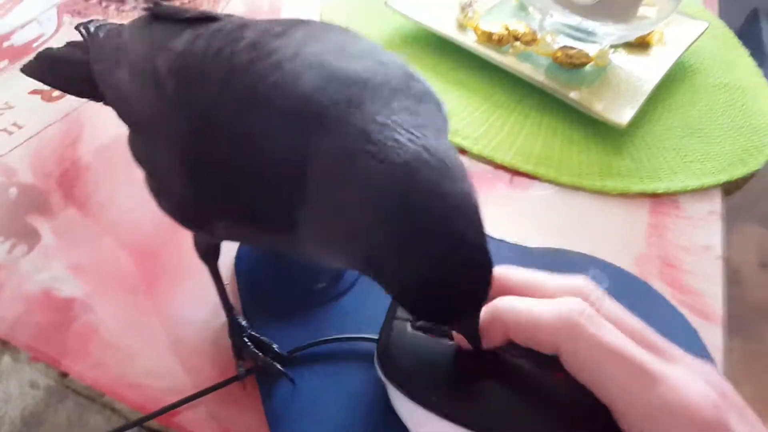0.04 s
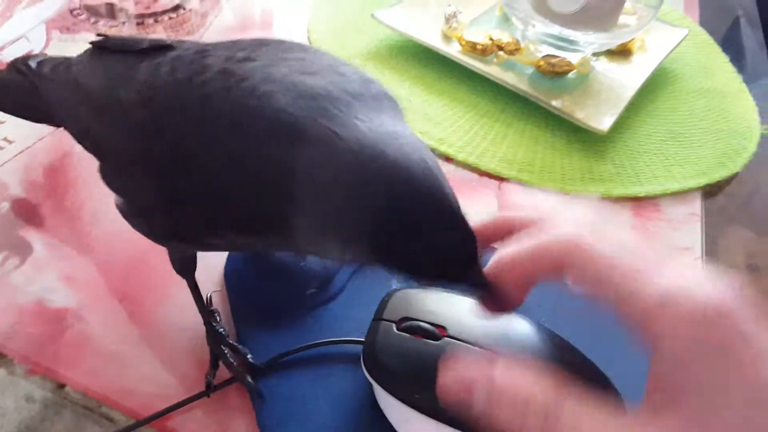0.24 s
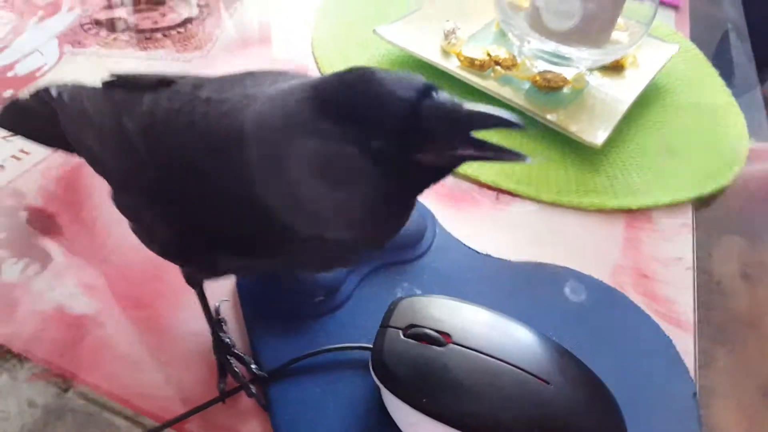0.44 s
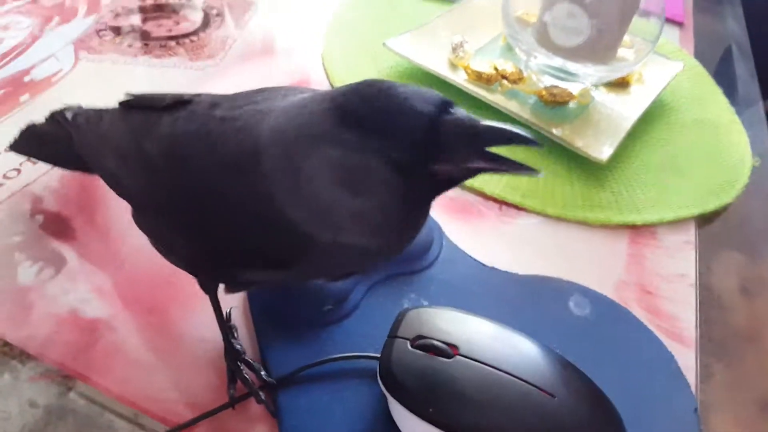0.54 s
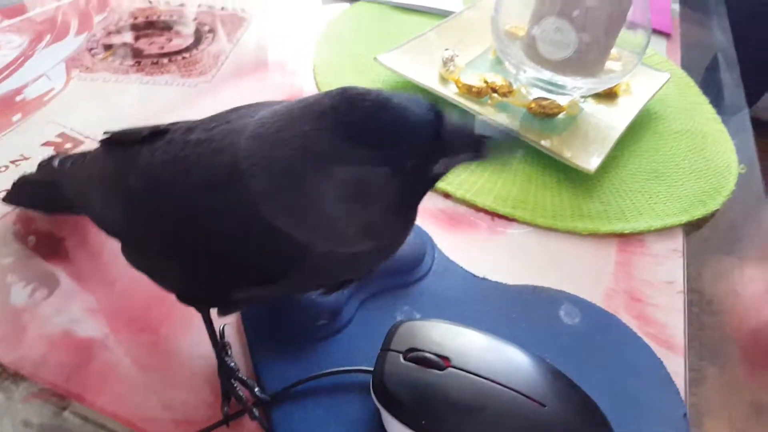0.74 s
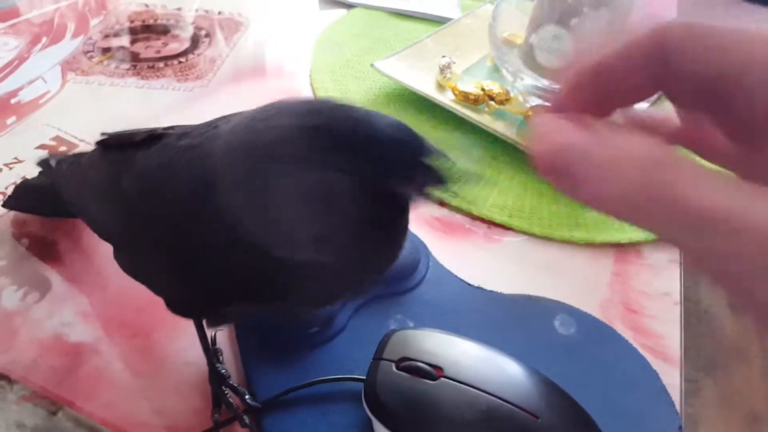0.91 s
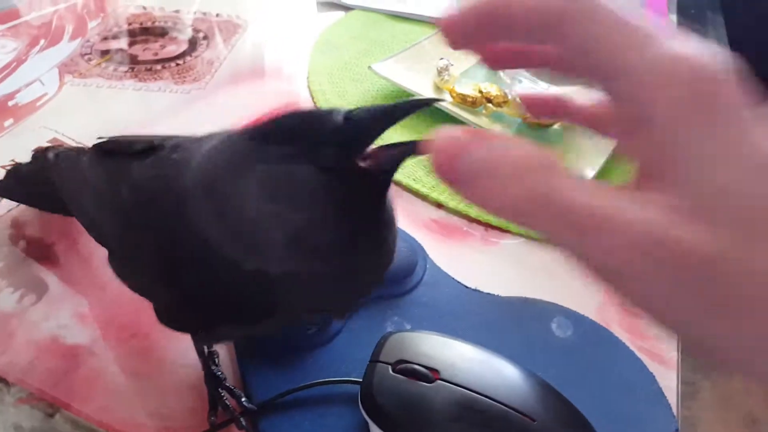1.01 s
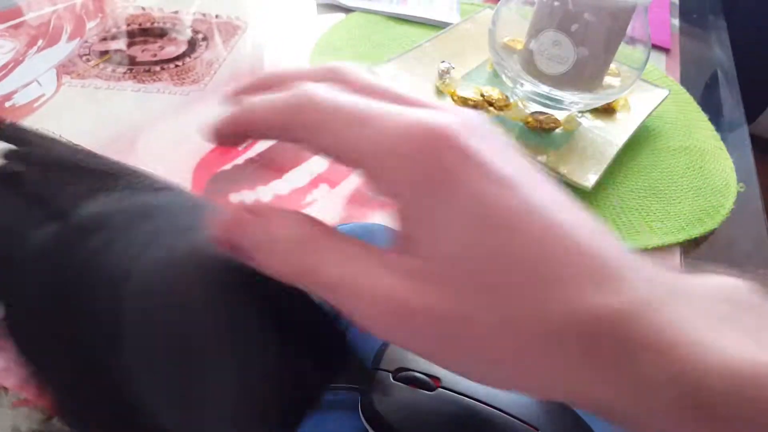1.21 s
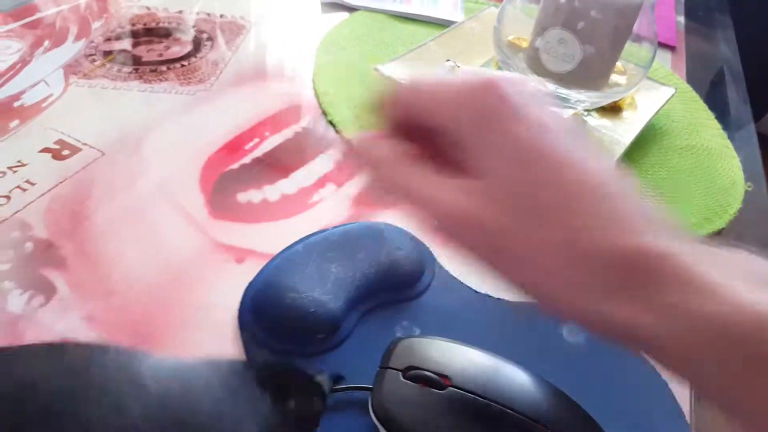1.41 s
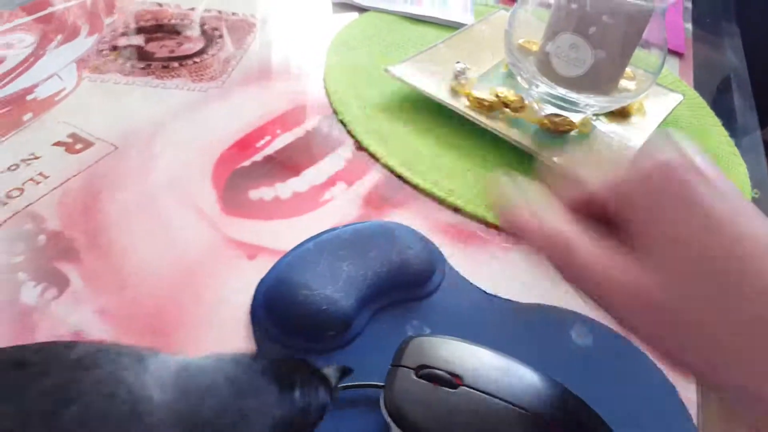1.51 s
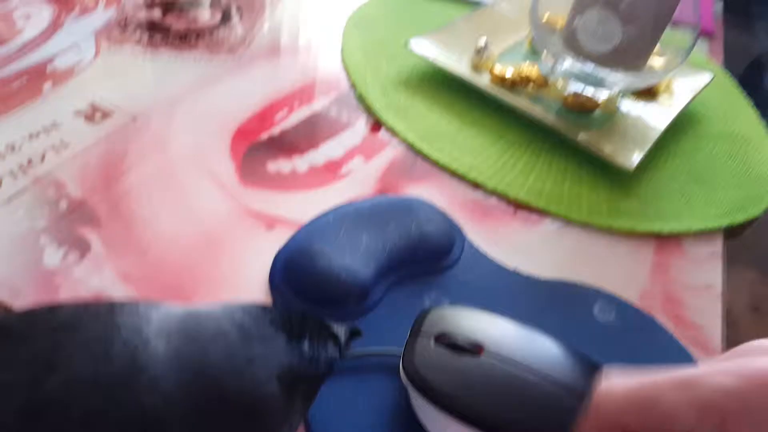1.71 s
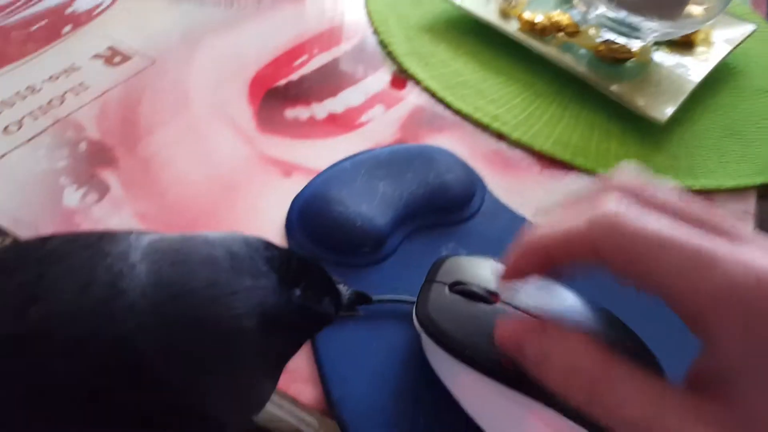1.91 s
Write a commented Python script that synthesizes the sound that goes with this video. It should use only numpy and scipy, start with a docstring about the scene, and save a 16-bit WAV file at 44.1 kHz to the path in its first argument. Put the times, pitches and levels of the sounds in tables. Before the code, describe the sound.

A jackdaw scolds with four short, harsh, buzzy calls dropping in pitch. Before them its beak raps hollow plastic in a quick double knock; faint table brushes and claw ticks fall between calls. Close stereo, small quiet room.

```python
"""A faint brush over the low hum of a small room, then a tame jackdaw on a table knocks a plastic shell.
It scolds a hand with four harsh calls: noise bursts click its beak, then uneven pulses sound a buzzy note
that drops in pitch and ends in a creak. Grainy noise brushes the table between calls, with small claw ticks.
Two close microphones hear it all, with echoes off nearby things and a short room ring."""
import sys
import numpy as np
from scipy import signal
from scipy.fft import rfft, irfft, next_fast_len
from scipy.io import wavfile
from scipy.ndimage import uniform_filter1d

SR = 44100
rng = np.random.default_rng(int(sys.argv[2]) if len(sys.argv) > 2 else 0)


def output_pcm(signal):
    """Save a mono or channel-first signal as 16-bit PCM at the path in sys.argv[1].

    Samples are clipped to [-1, 1] before scaling.
    """
    pcm = np.clip(np.atleast_2d(signal).T, -1, 1) * 32767
    wavfile.write(sys.argv[1], SR, np.round(pcm).astype(np.int16))


N = 85995
T = np.arange(N) / SR  # time in seconds

# Hum of the quiet room. Each row: frequency in Hz, level in dB.
HUM_SPECTRUM = [(22, -21), (50, -10), (110, 0), (175, -8), (260, -9), (480, -19), (15000, -42)]
HUM_DB, HUM_SIDE = -62.5, .2  # level; share that differs between the microphones

# Hand and feet brush the table. Each row: middle in seconds, half length in seconds, level in dB.
BRUSH_STROKES = [(.005, .045, -52), (1.184, .013, -39), (1.213, .008, -36), (1.457, .013, -48)]
# Colour of the brushing. Each row: frequency in Hz, level in dB.
BRUSH_SPECTRUM = [(30, -31.5), (130, -3), (280, -16), (600, 3.5), (1200, -8.5), (2200, -8), (14000, -33.5)]
BRUSH_GRAIN_DB = 2
# Claws tick on the table. Each row: start in seconds, level in dB.
CLAW_TICKS = [(1.206, -32), (1.418, -37)]
# Colour of a claw tick. Each row: frequency in Hz, level in dB.
CLAW_SPECTRUM = [(100, -15.5), (800, -1.5), (9000, -13.5), (15000, -1.5)]
CLAW_DECAY_S = 0.0013

# The beak knocks on a plastic shell.
# Each row: start in seconds, level in dB, decay in seconds, treble tilt in dB per octave.
SHELL_PECKS = [(.172, -45.5, 0.0037, 2.5), (0.2036, -15.5, 0.0017, 7.5), (.2085, -27.5, 0.017, 2),
               (0.2134, -11, 0.0019, 3.5), (.223, -35, 0.012, 1)]
# Colour of the shell. Each row: frequency in Hz, level in dB.
SHELL_SPECTRUM = [(200, -56.5), (660, 9), (1000, -7), (1900, -4.5), (2600, -4), (3200, -21), (3900, -10),
                  (6000, -28.5), (15000, -43.5)]
# Ringing modes of the shell. Each row: frequency in Hz, level in dB against the knock, t60 in seconds.
SHELL_RINGS = [(690, -6, .013), (620, -26, .15)]

# Beak click before each call. Each row: start in seconds, level in dB.
CLICKS = [(0.3697, -15), (1.0004, -22), (1.237, -15.5), (1.533, -20)]
# Colour of the beak. Each row: frequency in Hz, level in dB.
BEAK_SPECTRUM = [(100, -38), (350, -5), (600, 6), (900, -9), (1900, -1), (3000, -13.5), (15000, -51.5)]
BEAK_DECAY_S = 0.0015

# Course of each call. Each row: time in seconds, pitch in Hz, level in dB before VOICE_DB,
# roughness from 0 to 1, moving throat resonance in Hz.
FIRST_CALL = [(.375, 1650, -34.5, 0.25, 1590), (.382, 1561, -20.5, 0.28, 1720), (.388, 818, -16, 0.1, 1580),
              (0.394, 781.3, -11, 0.1, 2120), (.403, 749, -13.5, 0.17, 2380),
              (0.408, 563, -11.5, 0.35, 2400), (0.422, 554.2, -13, 0.36, 1750),
              (.444, 470.7, -18.5, 0.3, 1570), (0.453, 446.6, -14.5, 0, 2700),
              (0.475, 387.4, -20, 0.47, 1760), (0.489, 329.5, -23, 0.74, 1700),
              (0.507, 354.5, -33.5, 0.3, 390)]
SECOND_CALL = [(1.014, 1765, -21, 0.45, 1816), (1.019, 1498, -26, 0.8, 1790),
               (1.022, 691.3, -13.5, 0.87, 1350), (1.033, 682, -13.5, 0.93, 2100),
               (1.052, 593, -13, 0.22, 2180), (1.062, 506.6, -18, 0.47, 2170),
               (1.079, 427.5, -18.5, 0.24, 1960), (1.09, 344.5, -25.5, 0.89, 2030),
               (1.103, 319, -32, 0.37, 400)]
THIRD_CALL = [(1.241, 1478, -31, 0.26, 1500), (1.249, 1536, -24, 0.38, 1565),
              (1.255, 725, -17.5, 0.57, 2560), (1.265, 633.5, -11.5, 0.68, 2730),
              (1.273, 691.7, -16, 0.66, 4100), (1.286, 609, -15, 0.091, 2440),
              (1.299, 486.3, -20.5, 0.24, 1000), (1.315, 401, -21.5, 0.34, 2340),
              (1.334, 298, -33.5, 0.35, 404)]
FOURTH_CALL = [(1.537, 1448, -36, 0.24, 1414), (1.543, 1275, -27.5, .2, 1200),
               (1.548, 889, -17, 0.23, 1000), (1.556, 661, -16.5, 0.57, 1372), (1.572, 662, -16, .8, 1400),
               (1.581, 648.4, -18.5, 0.31, 2080), (1.598, 585.4, -15, 0.16, 2370),
               (1.606, 526.6, -17, 0.047, 3170), (1.63, 510.2, -16.5, 0.024, 3210),
               (1.642, 492.9, -17, 0.015, 2450), (1.659, 465.2, -19, 0.04, 2330),
               (1.671, 394.4, -23.5, .7, 3000), (1.687, 350.4, -34, 0.23, 500)]
# Colour of throat and open beak in each call. Each row: frequency in Hz, level in dB.
FIRST_THROAT = [(350, -9), (600, -6), (950, -8.5), (1500, -2), (2000, -2), (2500, 1.5), (3300, -1.5),
                (4300, -7), (5200, -3), (6000, -10.5), (7200, -6.5), (9000, -15), (15000, -27)]
SECOND_THROAT = [(350, -11), (600, -2.5), (950, -5.5), (1500, -1), (2000, -3.5), (2500, 1), (3300, -1),
                 (4300, -2.5), (5200, -15.5), (7200, -9.5), (9000, -16.5), (10300, -15.5), (15000, -31.5)]
THIRD_THROAT = [(350, -12), (600, -2.5), (950, -7), (1500, -9.5), (2000, -2), (2500, -3.5), (4100, 1),
                (5200, -16.5), (7200, -5.5), (9000, -18), (10300, -9), (12200, -26.5), (15000, -20.5)]
FOURTH_THROAT = [(450, -13.5), (650, -3.5), (1000, -2.5), (1500, 2.5), (2000, -5), (2500, -3), (3200, -1),
                 (4300, -13.5), (5200, -18.5), (7000, -5), (9000, -20.5), (10300, -15), (15000, -32)]
# How much later each call reaches the right microphone. One entry per call: delay in ms.
RIGHT_LAGS_MS = [0.06, 0.12, 0.09, 0.11]

# Unevenness of the syrinx at full roughness: jitter in log pitch, half tone and rasp as amplitudes
JITTER, JITTER_PER_S, SHIMMER_DB, HALF_TONE, RASP = .06, 250, 3.5, .65, .65
RASP_ABOVE_HZ = 1200
PARTIAL_WANDER_DB, PARTIAL_SLIP_RAD, PARTIAL_WANDER_PER_S = 6, 1.6, 45
DULL_PER_DB = 0.2022  # overtones lose this many dB per octave for each dB below a call's peak
RESONANCE_DB, RESONANCE_WIDTH_HZ = 9, 260
# Span of the fixed throat and beak resonances. Entries: lowest in Hz, highest in Hz.
RING_SPAN_HZ = (1100, 12000)
RING_WIDTH_HZ = 450
FADE_S, VOICE_DB, LOW_CUT_HZ = 0.0014, 1, 207

# Echoes off table and nearby things. Each row: left delay in ms, right delay in ms, level in dB.
NEAR_ECHOES = [(0.901, 1.1, -25), (2.3, 1.9, -32)]
# Left microphone minus right. Each row: frequency in Hz, difference in dB.
MICROPHONE_DIFFERENCE = [(300, 0), (650, 3.5), (1500, 6.5), (2500, -1.5), (3300, -1), (4300, 2), (6000, -5),
                         (7200, -6), (9000, 2), (10300, 8), (12200, 1)]
# Ring time of the room. Each row: frequency in Hz, t60 in seconds.
ROOM_RING_TIME = [(500, .36), (2500, .36), (7000, .29), (15000, .21)]
# Strength of the room's tail. Each row: frequency in Hz, level in dB.
ROOM_SPECTRUM = [(300, -9.5), (700, -11), (1500, -15), (2000, -16), (2500, -10), (3200, -16), (4200, -14),
                 (7000, -11), (15000, -13)]
# Narrow tones that ring on in the room. Each row: frequency in Hz, level in dB, t60 in seconds.
RINGING_TONES = [(1010, -12, .35), (1450, -14, .35), (2380, -3, .42), (2520, -4, .42)]
EARLY_DB, EARLY_DECAY_S, ROOM_GAP_S = -8, .009, .0015
TURN_AWAY_DB_PER_S = 6  # the bird turns from the microphones, so the room's share grows
CUTOFF_HZ = 15800


def from_db(db):
    """Decibels to gain."""
    return 10 ** (np.asarray(db) / 20)


def rms_one(x):
    """Scale to unit power."""
    return x / np.sqrt(np.mean(x ** 2) + 1e-20)


def at_hz(points, hz):
    """Read a table on a log-frequency axis."""
    f, v = np.transpose(points)
    return np.interp(np.log(np.maximum(hz, 1)), np.log(f), v)


def colour(x, points, power=1, unit=True):
    """Causal (minimum-phase) filter with the given spectrum; unit keeps the power of white noise."""
    size = 2 * next_fast_len(N)
    hz = np.arange(size // 2 + 1) * SR / size
    gain = from_db(power * at_hz(points, hz))
    cepstrum = irfft(np.log(rms_one(gain) if unit else gain))
    # folding the cepstrum forward in time makes the filter causal
    cepstrum[1:size // 2] *= 2
    cepstrum[size // 2 + 1:] = 0
    return irfft(rfft(x, size) * np.exp(rfft(cepstrum)))[..., :N]


def high_pass(x, hz, order=2):
    """Take away what lies below a frequency."""
    return signal.sosfilt(signal.butter(order, hz, "high", fs=SR, output="sos"), x)


def drift(rate):
    """Smooth chance with spread 1: noise through two equal low-pass poles at rate in Hz."""
    r = np.exp(-2 * np.pi * rate / SR)
    noise = rng.standard_normal(N + SR)
    settled = signal.lfilter([1], [1, -2 * r, r * r], noise)[SR:]
    return rms_one(settled)


def delay(x, ms):
    """Delay by any fraction of a sample, as a phase slope."""
    size = 2 * next_fast_len(N)
    hz = np.arange(size // 2 + 1) / size * SR
    return irfft(rfft(x, size) * np.exp(-2j * np.pi * hz * ms / 1000))[:N]


def burst(s, db, decay_s):
    """A contact: noise that starts at once and dies away."""
    fall = np.exp(-np.clip((T - s) / decay_s, 0, 60))
    return from_db(db) * (T >= s) * fall * rng.choice([-1, 1], N)


def room_hum():
    """Low coloured noise, mostly shared by the two microphones."""
    shared = rng.standard_normal(N)
    noise = shared + HUM_SIDE * rng.standard_normal((2, N))
    return from_db(HUM_DB) * colour(noise, HUM_SPECTRUM)


def scuffle():
    """Friction on the table as grainy noise under smooth strokes, with short noise bursts for claws."""
    strokes = sum(from_db(db) * np.exp(-.5 * ((T - s) / half) ** 2) for s, half, db in BRUSH_STROKES)
    grain = from_db(BRUSH_GRAIN_DB * drift(100)) * rng.standard_normal(N)
    ticks = sum(burst(s, db, CLAW_DECAY_S) for s, db in CLAW_TICKS)
    return colour(strokes * grain, BRUSH_SPECTRUM) + colour(ticks, CLAW_SPECTRUM)


def pecks():
    """The beak hits, skids and knocks as noise bursts; decaying sines ring the hollow shell."""
    out = np.zeros(N)
    for s, db, decay_s, tilt_db in SHELL_PECKS:
        tilted = [(hz, d + tilt_db * np.log2(hz)) for hz, d in SHELL_SPECTRUM]
        out += colour(burst(s, db, decay_s), tilted)
        age = np.maximum(T - s, 0)
        for hz, mode_db, t60 in SHELL_RINGS:
            fall = np.exp(-np.log(1000) * age / t60)
            out += from_db(db + mode_db) * fall * np.sin(2 * np.pi * hz * age)
    return high_pass(out, 420)


def beak_clicks():
    """The beak parts softly before each call: short bursts in the colour of the beak."""
    clicks = sum(burst(s, db, BEAK_DECAY_S) for s, db in CLICKS)
    return colour(clicks, BEAK_SPECTRUM)


def ring_on(x):
    """Many narrow resonances of throat and beak, as all-passes, smear each pulse over its cycle."""
    r = np.exp(-np.pi * RING_WIDTH_HZ / SR)
    for hz in np.geomspace(*RING_SPAN_HZ, 14):
        a = [1, -2 * r * np.cos(2 * np.pi * hz / SR), r * r]
        x = signal.lfilter(a[::-1], a, x)
    return x


def syrinx_pulses(pitch, phase, rough, slope_db, resonance_hz, on):
    """Overtones sum to pulses, uneven where rough, duller when weak; a moving resonance lifts some."""
    pulses, wander = np.zeros(N), drift(PARTIAL_WANDER_PER_S)
    half_tone = 1 + HALF_TONE * rough * np.cos(phase / 2)
    uneven = half_tone * from_db(SHIMMER_DB * rough * drift(JITTER_PER_S))
    for k in range(1, 50):
        # rough partials break up: each reads the wander at its own random places
        places = (np.flatnonzero(on) + rng.integers(N, size=(2, 1))) % N
        swell, slip = np.sqrt(rough[on]) * wander[places]
        hz = k * pitch[on]
        lift_db = RESONANCE_DB * np.exp(-.5 * ((hz - resonance_hz[on]) / RESONANCE_WIDTH_HZ) ** 2)
        partial_db = slope_db[on] * np.log2(k) + lift_db + PARTIAL_WANDER_DB * swell
        partial = from_db(partial_db) * np.cos(k * phase[on] + PARTIAL_SLIP_RAD * slip)
        partial *= hz < CUTOFF_HZ
        # the fundamental carries no half tone or shimmer
        pulses[on] += partial * uneven[on] if k > 1 else partial
    return pulses * np.sqrt(2 * pitch / CUTOFF_HZ)


def breath_rasp(phase, rough, slope_db):
    """Noise that swells once per pulse where the syrinx is rough."""
    strength = RASP * rough * from_db(3 * slope_db)
    return high_pass(strength * (1 + np.cos(phase)) * rng.standard_normal(N), RASP_ABOVE_HZ)


def call(rows, throat):
    """Syrinx pulses and rasp ring in the throat and follow the call's course of pitch and level."""
    s, hz, db, rough, resonance_hz = np.transpose(rows)
    rough = np.clip(np.interp(T, s, rough), 0, 1)
    level_db = np.interp(T, s, db)
    resonance_hz = np.interp(T, s, resonance_hz)
    pitch = np.exp(np.interp(T, s, np.log(hz)) + JITTER * rough * drift(JITTER_PER_S))
    phase = 2 * np.pi * np.cumsum(pitch) / SR
    gate = np.clip(np.minimum(T - s[0], s[-1] - T) / FADE_S + 1, 0, 1)
    slope_db = DULL_PER_DB * (level_db - db.max())
    pulses = syrinx_pulses(pitch, phase, rough, slope_db, resonance_hz, gate > 0)
    voice = ring_on(colour(pulses + breath_rasp(phase, rough, slope_db), throat))
    # even out the running power, so the course alone sets the level
    voice /= np.sqrt(np.abs(uniform_filter1d(voice ** 2, size=300)) + 1e-3)
    return high_pass(voice * gate * from_db(level_db + VOICE_DB) + 1e-18, LOW_CUT_HZ, order=4)


def jackdaw_calls():
    """Four calls from a little to the left, so each reaches the right microphone later."""
    courses = (FIRST_CALL, SECOND_CALL, THIRD_CALL, FOURTH_CALL)
    throats = (FIRST_THROAT, SECOND_THROAT, THIRD_THROAT, FOURTH_THROAT)
    calls = [call(rows, throat) for rows, throat in zip(courses, throats)]
    right = sum(delay(c, ms) for c, ms in zip(calls, RIGHT_LAGS_MS))
    return np.array([sum(calls), right])


def near_echoes(near):
    """Single late copies off the table and nearby things, timed for each microphone."""
    return sum(from_db(db) * np.array([delay(near[0], left_ms), delay(near[1], right_ms)])
               for left_ms, right_ms, db in NEAR_ECHOES)


def microphones(left, right):
    """Each close microphone takes half of their difference in colour, in opposite senses."""
    return np.array([colour(left, MICROPHONE_DIFFERENCE, .5, False),
                     colour(right, MICROPHONE_DIFFERENCE, -.5, False)])


def room(x):
    """Dense early reflections, a tail that dies band by band and a few ringing tones."""
    age = np.maximum(T[:SR * 2 // 3] - ROOM_GAP_S, 0)
    early = np.sqrt(2 / (EARLY_DECAY_S * SR)) * np.exp(-age / EARLY_DECAY_S)
    response = from_db(EARLY_DB) * early * rng.standard_normal((2, len(age)))
    edges = np.geomspace(150, 17000, 12)
    for low, high in zip(edges, edges[1:]):
        hz = np.sqrt(low * high)
        life = at_hz(ROOM_RING_TIME, hz) / np.log(1000)
        band_pass = signal.butter(2, [low, high], "band", fs=SR, output="sos")
        band = signal.sosfilt(band_pass, rng.standard_normal((2, len(age))))
        fall = np.sqrt(2 / (life * SR)) * np.exp(-age / life)
        response += band * from_db(at_hz(ROOM_SPECTRUM, hz)) * fall
    for hz, db, t60 in RINGING_TONES:
        life = t60 / np.log(1000)
        fall = 2 / (life * SR) * np.exp(-age / life)
        response += from_db(db) * fall * np.sin(2 * np.pi * hz * age)
    return signal.fftconvolve(x, response * (age > 0), axes=1)[:, :N]


def scene():
    """Bird and hand, direct and reflected, over the hum of the room."""
    hum = room_hum()
    near = scuffle() + pecks() + beak_clicks() + jackdaw_calls()
    direct = microphones(*(near + near_echoes(near)))
    turned_away = from_db(TURN_AWAY_DB_PER_S * (T - T.mean()))
    return direct + room(near * turned_away) + hum


def record(dry):
    """The highest peaks are clipped, then a steep low-pass cuts the top."""
    low_pass = signal.ellip(10, .1, 80, CUTOFF_HZ, fs=SR, output="sos")
    return signal.sosfilt(low_pass, np.clip(dry, -1, 1))


dry = scene()
out = record(dry)
output_pcm(out)
```